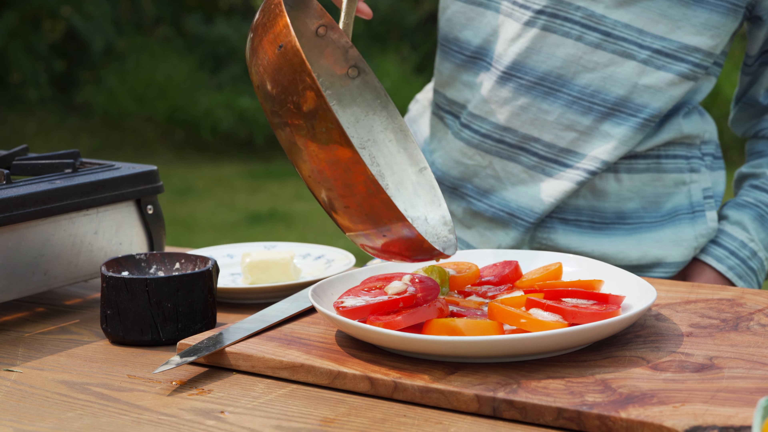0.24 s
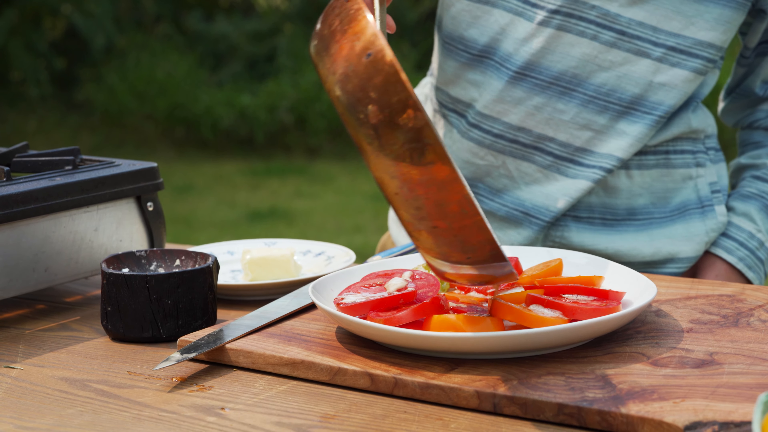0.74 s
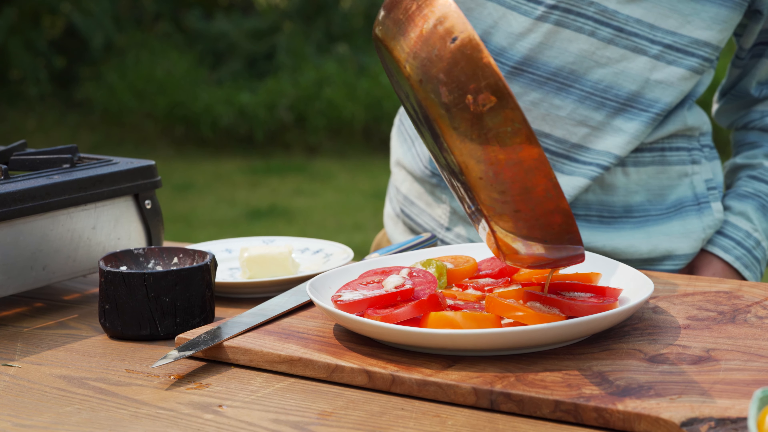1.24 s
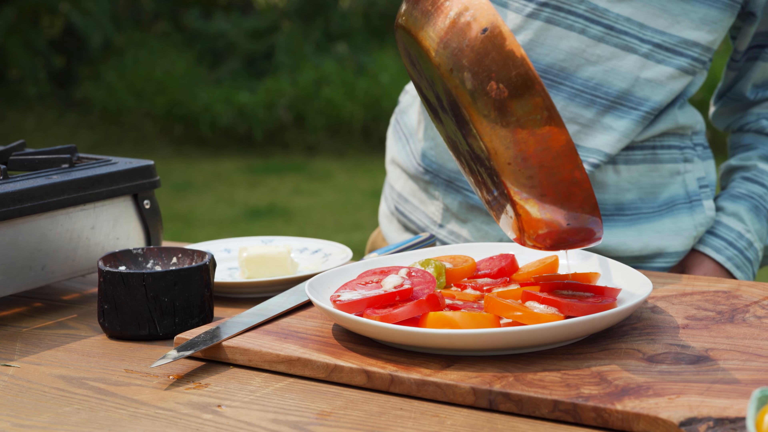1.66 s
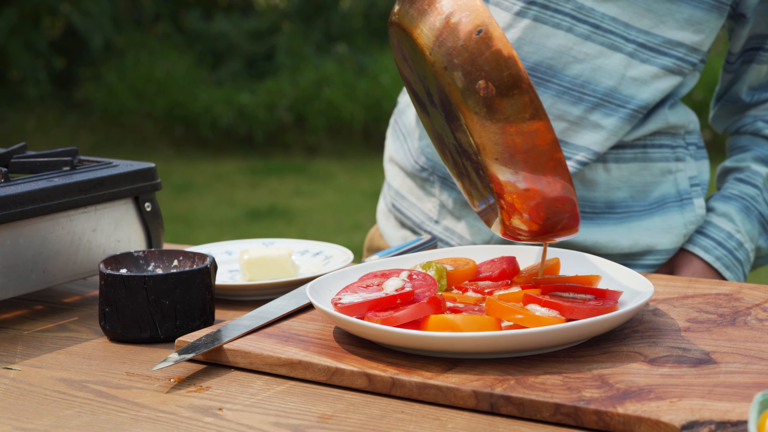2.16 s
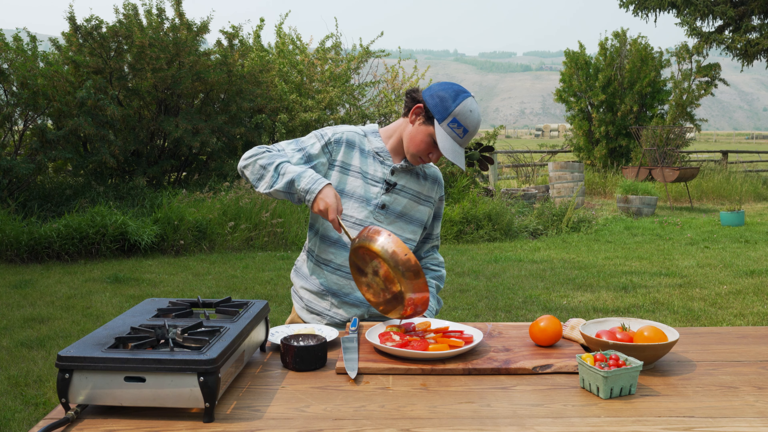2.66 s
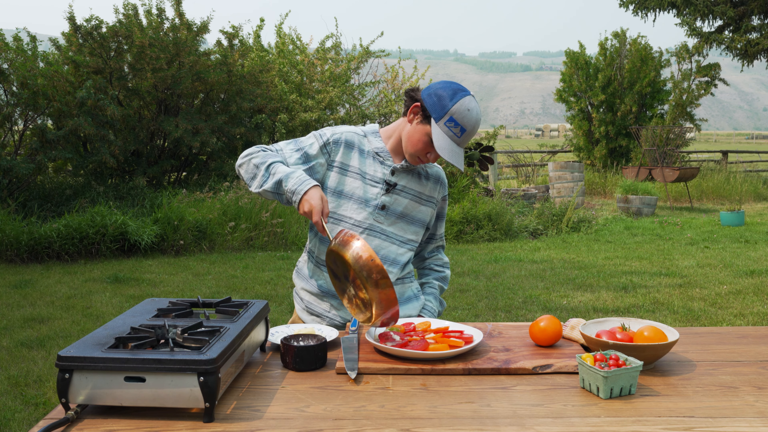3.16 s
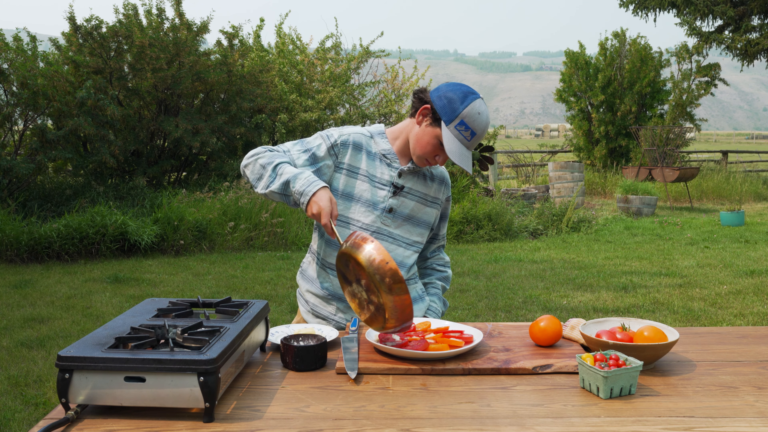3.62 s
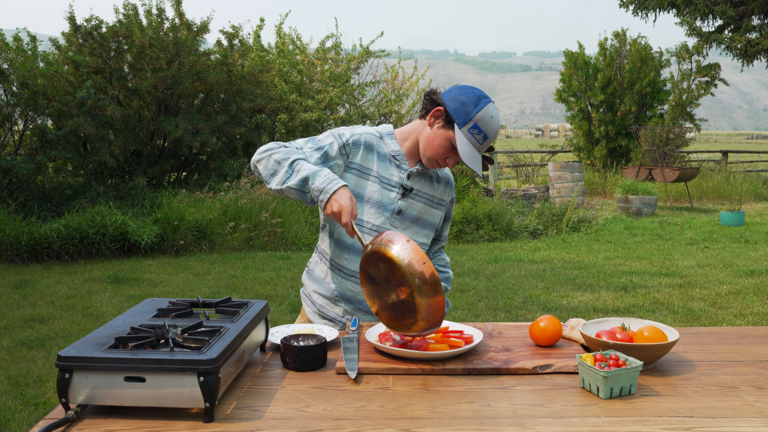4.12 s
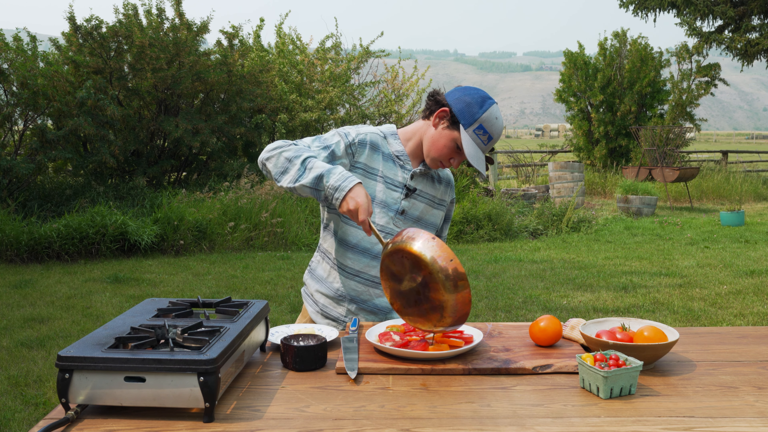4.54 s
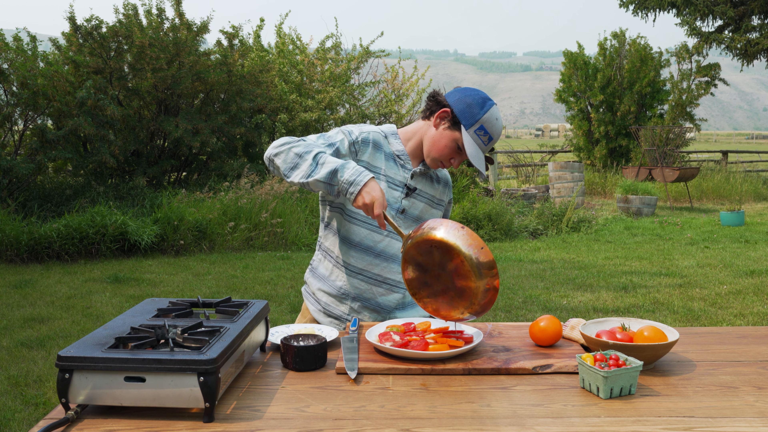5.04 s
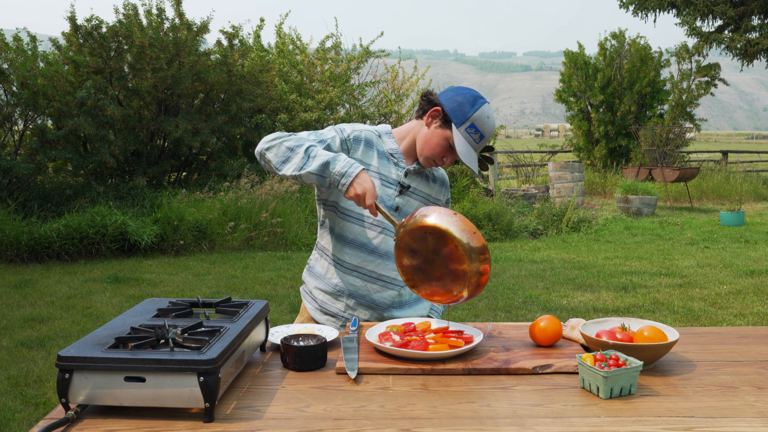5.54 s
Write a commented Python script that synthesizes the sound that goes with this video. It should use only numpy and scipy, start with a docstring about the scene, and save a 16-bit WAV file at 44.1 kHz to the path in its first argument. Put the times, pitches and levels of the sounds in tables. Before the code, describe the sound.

Hot butter poured from a metal pan hits a plate of wet tomato slices and sizzles at once, a bright hiss dotted with sharp little pops. This opening flurry fades by about 0.7 seconds. From there to 2 seconds only light, scattered crackles and brief soft hisses remain. The sizzle picks up modestly from about 2.2 to 3.3 seconds, then almost stops. At 4 seconds it swells again, with some of the loudest pops around 4.4 seconds, and thins out by 5. A last high hiss rises from about 5.4 seconds to the end. The tone of the bubbling shifts slightly as the pan tilts. Throughout, outdoor wind buffets the microphone with a low, uneven rumble, with short thumps near 1 second and stronger gusts from 4 seconds on. A faint hush of leaves and distant air sits underneath.

```python
"""A sizzle comes first, as hot butter runs from a tilted pan over cold, wet tomatoes. Steam bubbles
burst in flurries, a few loudly; each is a damped oscillator that also spits a puff of noise, and in
crowds they merge into a hiss. The air between pan and plate resonates at pitches set by the tilt.
Outdoors, eddies of wind buffet a small microphone; leaves and the far valley hush over a faint drone."""
import sys
import numpy as np
from scipy import signal
from scipy.fft import rfft, irfft, next_fast_len
from scipy.io import wavfile
from scipy.ndimage import uniform_filter1d, map_coordinates

SR = 44100
rng = np.random.default_rng(int(sys.argv[2]) if len(sys.argv) > 2 else 0)


def unload_wav(signal):
    """Save mono or channel-first audio to the path in sys.argv[1] as 16-bit WAV at rate SR, clipped to [-1, 1]."""
    wavfile.write(
        sys.argv[1],
        SR,
        np.round(np.clip(np.atleast_2d(signal).T, -1, 1) * 32767).astype(np.int16),
    )


N = 254898

# Flurries as butter meets wet, cold flesh. Each row: start and end in seconds, heat (the strength of
# the sizzle) at start and at end in dB, large bubbles over heat in dB, smoothness in dB (hiss gained
# and crackle lost).
FLURRIES = [(0, 0.361, -43, -53, 5, 1), (0.358, .7, -53, -61, 2.5, 0), (0.701, 0.788, -65, -66, 8, 5.5),
            (.8, 0.869, -64, -65, 5, -0.5), (0.973, 1.153, -67, -68, 3, 1),
            (1.251, 1.399, -74.5, -73, 5, -0.5), (1.431, 1.7, -65, -66, 1, 2),
            (2.11, 2.341, -66, -61, -0.5, 1.5), (2.338, 2.56, -59.5, -61, 4, 1),
            (2.569, 2.703, -63, -65, 3.5, 1), (2.744, 3.212, -60, -67, 2.5, -1),
            (3.279, 3.339, -63.5, -65, -1, 1.5), (3.365, 3.546, -71, -75, -0.5, -4),
            (3.971, 4.301, -72, -55, -2.5, -3), (4.301, 4.598, -54, -58, -3.5, -3),
            (4.63, 4.737, -64.5, -63, 0, 1.5), (4.789, 4.99, -64, -68, 2, 1),
            (5.349, 5.44, -66, -63, 0.5, 4.5), (5.445, 5.782, -57, -53, 0.5, 2.5)]
CATCH_DB_PER_S, DIE_DB_PER_S = 260, 190  # rise and fall of a flurry
SIMMER_DB, SIMMER_LARGE_DB = -78, -76  # heat and large bubbles between flurries
# Bursts that stand out. Each row: start in seconds, level in dB, pitch in Hz, relative spit in dB.
LOUD_BURSTS = [(0.044, -24.5, 6570, -29), (0.064, -16, 2510, -29), (0.0854, -18, 2570, -15),
               (0.169, -26, 2330, -1.5), (0.189, -20.5, 5130, -13), (0.1998, -20.5, 9300, -10),
               (0.258, -22, 6360, -14.5), (0.3152, -39, 2040, 3), (0.346, -38, 3450, 5),
               (0.373, -28.5, 4600, -25), (0.476, -28.5, 4300, -13), (0.5035, -20.5, 3440, -5),
               (0.521, -33, 3430, -3.5), (0.612, -31, 9200, -16), (0.6646, -37, 2580, -4.5),
               (0.767, -45.5, 4630, 1.5), (0.835, -46, 2320, -1), (1.0275, -30.5, 9700, -20),
               (1.07, -32.5, 10100, -36), (1.113, -45, 3120, -7), (1.1304, -43, 1990, -34),
               (1.1534, -38, 4200, -2.5), (1.167, -31, 1820, -19), (1.289, -49.5, 1970, 0),
               (1.422, -35.5, 8400, -18), (1.452, -38.5, 3470, -4.5), (1.4607, -38, 2230, -18),
               (1.538, -39.5, 8700, -5.5), (1.554, -41, 5600, -6), (1.6048, -35.5, 6000, -13),
               (1.6258, -44, 5700, -19), (1.639, -39, 10000, -14), (1.67, -41.5, 5570, -1),
               (1.7774, -44, 2280, -6), (2.147, -35, 7300, -22), (2.207, -36.5, 12200, -3),
               (2.279, -40.5, 1920, -9), (2.3292, -30.5, 5150, -16), (2.38, -37, 3470, 2),
               (2.4325, -39, 3700, -4), (2.509, -48, 3470, -2), (2.5255, -45.5, 3410, 1),
               (2.546, -47.5, 3500, 4), (2.604, -46.5, 3600, -3), (2.658, -41.5, 6500, -2),
               (2.6688, -43.5, 3630, -2), (2.6982, -39.5, 2200, -20), (2.7427, -40, 5000, -10),
               (2.76, -36.5, 2200, -14), (2.777, -43.5, 3480, 3), (2.825, -32.5, 10500, -14),
               (2.887, -27.5, 7600, -38), (2.9177, -33.5, 2170, -10.5), (2.957, -36, 3180, 2.5),
               (2.975, -29.5, 7400, -22), (3.0609, -40, 5810, -6), (3.0755, -42, 2720, -8),
               (3.1291, -35, 5960, -12.5), (3.282, -35, 8200, -18), (3.3157, -32.5, 8500, -11),
               (3.4401, -45.5, 2030, -11), (3.461, -38, 11000, -12.5), (3.549, -51, 3420, 3.5),
               (3.83, -51, 3450, -19), (3.875, -46.5, 3400, -21), (4.006, -41.5, 5070, -5),
               (4.04, -40.5, 2570, -16), (4.05, -41.5, 2470, -7.5), (4.074, -36.5, 5300, 0),
               (4.1001, -26.5, 5600, -11), (4.152, -38, 2600, 2.5), (4.1676, -31.5, 4800, -4),
               (4.2022, -42, 2470, -1), (4.2199, -25.5, 9300, -17), (4.2353, -26.5, 7800, -36),
               (4.261, -29.5, 7150, -34), (4.322, -31, 6650, -31), (4.342, -28.5, 7300, -33),
               (4.4048, -19, 3390, -20), (4.429, -25.5, 4700, -11.5), (4.452, -15.5, 2440, -21),
               (4.46, -33.5, 2500, -8), (4.4768, -28, 7800, -13), (4.4943, -30, 6300, -18),
               (4.522, -29, 9980, -21), (4.541, -22.5, 9300, -22), (4.5602, -34.5, 6400, -11.5),
               (4.5948, -37, 4870, -14), (4.6514, -37, 5040, -11), (4.6832, -36, 4800, -12),
               (4.7196, -40.5, 4900, -6), (4.783, -41, 5810, -7), (4.797, -42.5, 5000, -9),
               (4.821, -39, 5000, -3), (4.871, -38, 5000, -28), (4.886, -41, 5000, -9),
               (4.918, -36.5, 9500, -15), (4.939, -38, 4880, -10.5), (5.046, -61, 2400, 11.5),
               (5.087, -35.5, 11600, -13.5), (5.1873, -50.5, 4950, 2), (5.223, -50.5, 5100, -1),
               (5.24, -54, 2400, 5), (5.393, -35.5, 10500, -20), (5.462, -34, 8800, -9),
               (5.5436, -39, 12200, -4), (5.608, -36.5, 12300, -12), (5.613, -37, 4800, -5),
               (5.637, -34, 4850, -6.5), (5.737, -35.5, 5000, -9)]
EVEN_HZ, BRIGHTER_DB_PER_OCT, LOUD_DULLS = 5900, 3.5, 0.49  # spit brightens with pitch, dulls with level
OVERTONE_RATIO, OVERTONE_DB = 1.257, -5.5  # second ring of a loud burst
RING_CYCLES_EXPONENT = 0.25  # smaller, higher bubbles ring for more cycles
# Spectra of a burst's noise. Each row: frequency in Hz, relative spectral density in dB.
LOW_SPIT = [(1000, -17), (1800, -10), (2300, -1.5), (4500, -6), (7000, -4), (10000, -7.5)]
HIGH_SPIT = [(3000, -66), (5000, -2), (7000, -9.5), (10000, 0), (13000, -2), (16000, -13.5)]
THUD = [(250, -11), (600, -5.5), (1400, -4), (2200, -1.5)]
# Modes of the air pocket, one list for each tilt. Each row: frequency in Hz, bandwidth in Hz, gain in dB.
POCKET_MODES = [
    [(2510, 500, -4), (3330, 170, 0), (5000, 300, -15), (15200, 8300, -2)],
    [(1990, 68, 5.5), (2410, 45, 1), (9200, 180, -5)],
    [(3510, 160, 10), (2780, 74, -7), (4700, 630, 2), (6700, 430, 2), (12200, 780, -3)],
    [(2170, 410, -5.5), (2650, 78, 6), (3470, 240, 2), (5300, 390, -8), (7600, 980, -8.5)],
    [(2400, 440, 1.5), (4800, 500, 1), (9300, 1300, -7.5)],
    [(2200, 150, -1), (3230, 170, 2), (6650, 1100, -5.5)],
    [(2170, 100, 3.5), (3250, 320, -1.5), (4900, 240, 3)],
    [(3580, 220, 3), (4950, 370, 0.5), (8540, 430, -4), (10500, 430, 2.5), (12700, 810, 3),
     (15200, 2200, 6)],
]
# Each entry: the time in seconds at which one tilt gives way to the next.
TILT_ENDS = [1.0, 2.05, 2.72, 3.9, 4.25, 4.6, 5.28]
# Wind on the microphone. Each row: time in seconds, buffet level in dB, flutter over buffet in dB.
WIND_LEVELS = [(0, -42, -6.5), (.45, -48, -16.5), (0.85, -43, -14.5), (1.1, -44.5, -12.5),
               (1.35, -42.5, -4), (1.65, -40.5, -13.5), (2.1, -50, -11), (2.45, -55.5, -7.5),
               (2.6, -42.5, -9), (3.2, -47.5, -13.5), (3.85, -48, -15.5), (3.97, -39.5, -9.5),
               (4.15, -35, -13), (4.6, -40, -7.5), (4.8, -49, -3.5), (5.15, -40, -10.5), (5.45, -37, -10),
               (5.78, -37.5, -13)]
# Rushing air. Each row: time in seconds, level of the wind's body in dB, level of the far hush in dB.
HUSH_LEVELS = [(0.0, -66, -58.5), (0.24, -73.5, -67), (0.8, -70, -67), (2.22, -76, -69.5),
               (2.85, -65, -63.5), (3.33, -72, -70.5), (3.45, -64, -68), (3.8, -64.5, -68),
               (3.95, -76.5, -68.5), (4.7, -74, -70), (5.78, -65, -63.5)]
# Spectra of wind and background. Each row: frequency in Hz, relative spectral density in dB.
BUFFET = [(8.8, -34), (15, 0), (49, 3.5), (96, -5.5), (130, -23), (170, -49), (290, -120)]
FLUTTER = [(60, -13), (100, 0), (160, -9), (250, -22), (400, -37.5), (800, -51)]
WIND_BODY = [(150, -3.5), (280, 1.5), (450, -2.5), (700, -9), (1500, -21), (2600, -18)]
FAR_DRONE = [(88, -15), (100, 14), (112, -49)]
FAR_HUSH = [(400, -4.5), (800, 9.5), (1100, 8.5), (1600, -0.5), (2300, -4.5), (4200, -13), (12000, -16),
            (16000, -10)]
# Gusts that thump the microphone. Each row: start in seconds, lift in dB, length in seconds.
GUSTS = [(0.553, 6, 0.05), (0.751, 13, 0.025), (0.91, 7.5, 0.047), (1.24, 4, 0.058), (1.279, 3.5, 0.037),
         (2.715, 8.5, 0.025), (2.878, -2, 0.048), (3.456, 3.5, 0.038), (4.034, 4, 0.036),
         (4.204, 2.5, 0.066), (4.668, 8.5, 0.039), (4.862, 7, 0.079), (5.054, 11.5, 0.049),
         (5.13, 9, 0.025), (5.198, 8, 0.069), (5.586, 6, 0.079)]
GUST_EDGE_S, FLUTTER_GROWS = 0.0058, 0.078  # rise and fall of a gust; extra share of its lift in flutter
TOP_HZ, EDGE_HZ = 15800, 16500
FFT_SIZE = next_fast_len(N + 8192)


def amp(db):
    return 10 ** (np.asarray(db) / 20)


def unit(x):
    return x / np.sqrt(np.mean(x ** 2) + 1e-20)


def curves(rows, t):
    """Each column after the time, interpolated at times t."""
    times, *columns = np.transpose(rows)
    return [np.interp(t, times, column) for column in columns]


def wobble(rate):
    """A smooth random curve of rate knots a second."""
    knots = rng.standard_normal(int(N * rate / SR) + 4)
    return map_coordinates(knots, [np.arange(N) * rate / SR])


def coloured(x, spectrum):
    """A filter of the given spectrum, scaled so that white noise keeps its power."""
    hz = np.fft.rfftfreq(FFT_SIZE, 1 / SR)
    knot_hz, db = np.transpose(spectrum)
    gain = amp(np.interp(np.log(hz + 1), np.log(knot_hz + 1), db, -120, -120))
    return irfft(rfft(x, FFT_SIZE) * unit(gain), FFT_SIZE)[:N]


def noise(spectrum, db):
    """Coloured noise, amplitude-modulated by a curve in dB."""
    return amp(db) * coloured(rng.standard_normal(N), spectrum)


def scatter(starts, rows):
    """Superposition of rows of samples, each at its start in seconds."""
    at = np.round(starts * SR).astype(int)[:, None] + np.arange(rows.shape[1])
    return np.bincount(at.ravel(), rows.ravel(), N + SR)[:N]


def flurries(t):
    """Boiling flares and dies exponentially; the strongest flurry prevails over a steady simmer."""
    start, end, first_db, last_db, large_db, smooth_db = np.transpose(FLURRIES)[..., None]
    each_db = first_db + (last_db - first_db) * np.clip((t - start) / (end - start), 0, 1)
    each_db -= CATCH_DB_PER_S * np.maximum(start - t, 0) + DIE_DB_PER_S * np.maximum(t - end, 0)
    heat_db = np.maximum(each_db.max(axis=0), SIMMER_DB)
    deep_db = np.maximum((each_db + large_db).max(axis=0), SIMMER_LARGE_DB)
    return heat_db, deep_db, smooth_db[each_db.argmax(axis=0), 0] * (heat_db > SIMMER_DB)


def bursts(starts, hz, ring_db, low_db, high_db, cycles, spit_s, samples):
    """Damped oscillation: each bubble rings, rising in pitch as it opens, and spits a puff of noise."""
    t = np.arange(samples) / SR
    fade = np.cos(np.pi / 2 * np.arange(samples) / samples)
    turns = hz[:, None] * t
    decay_turns = cycles * (hz[:, None] / 3000) ** RING_CYCLES_EXPONENT
    envelope = np.exp(-turns / decay_turns) * (1 - np.exp(-turns / 0.69)) * fade
    ring = np.sin(2 * np.pi * turns * (1 + 0.0048 * turns)) * envelope
    puff = np.exp(-t / spit_s) * (1 - np.exp(-t / 0.0001)) * fade
    sound = scatter(starts, amp(ring_db)[:, None] * ring)
    for db, spectrum in [(low_db, LOW_SPIT), (high_db, HIGH_SPIT)]:
        spits = amp(db)[:, None] * puff * rng.standard_normal(ring.shape)
        sound += coloured(scatter(starts, spits), spectrum)
    return sound


def sizzle(t, count=4200):
    """Incoherent addition: small bubbles burst in clumps, denser with heat, and merge into a hiss."""
    heat_db, deep_db, smooth_db = flurries(t)
    clumps_db = 6 * wobble(170) + 1.4 * wobble(45)
    activity = np.cumsum(amp(0.65 * heat_db + clumps_db))
    when, strength, kind = rng.random((count, 3)).T
    pitch_spread, low_spread, high_spread = rng.standard_normal((count, 3)).T
    starts = np.interp(when * activity[-1], activity, t)
    heat, deep, smooth = flurries(starts)
    # Few are strong and many weak; a crowd shares the power.
    share_db = -0.42 * (heat + 60) - smooth - 5.77 * np.log(strength + 0.09)
    large = kind < 0.3
    hz = np.clip(np.where(large, 3500, 9000) * np.exp(0.316 * pitch_spread), 2150, 15500)
    ring_db = share_db + np.where(large, deep - 3, heat + 2.8)
    low_db = share_db + deep + 5 * np.clip(low_spread, -3, 1.2) - 3.5
    high_db = share_db + heat + 5.3 * np.clip(high_spread, -3, 1.2) - 2.5
    crackle = bursts(starts, hz, ring_db, low_db, high_db, cycles=3.67, spit_s=0.00044, samples=128)
    merged_db = 0.52 * (heat_db + 41) + 0.055 * clumps_db + smooth_db - 7.5
    return crackle + noise(LOW_SPIT, merged_db + deep_db) + noise(HIGH_SPIT, merged_db + heat_db)


def drifting_colour(x, depth_db):
    """Spectral modulation: the level drifts in patches about a kilohertz by tens of milliseconds."""
    spectra = signal.stft(x, nperseg=256)[2]
    patches = uniform_filter1d(rng.standard_normal(spectra.shape), size=8, axis=0)
    patches = uniform_filter1d(patches, size=8, axis=1)
    return signal.istft(spectra * amp(depth_db * unit(patches)), nperseg=256)[1][:N]


def air_pocket(x, t):
    """Cavity resonance: the air between pan and plate adds one set of modes for each tilt."""
    f = np.fft.rfftfreq(FFT_SIZE, 1 / SR)
    tilt = np.searchsorted(TILT_ENDS, t)
    sound = np.zeros(N)
    for k, modes in enumerate(POCKET_MODES):
        resonance = sum(amp(db) * 1j * f * width / (hz * hz - f * f + 1j * f * width)
                        for hz, width, db in modes)
        sound += irfft(rfft(x * (tilt == k), FFT_SIZE) * (1 + resonance), FFT_SIZE)[:N]
    return sound


def wind(t):
    """Turbulent pressure: the same eddies drive a low buffet, a higher flutter and the wind's body."""
    buffet_db, flutter_db = curves(WIND_LEVELS, t)
    body_db, _ = curves(HUSH_LEVELS, t)
    lift_db = gusts(t)
    eddies = np.minimum(wobble(15), 1.2)
    buffet = amp(buffet_db + lift_db) * unit(noise(BUFFET, 2.84 * eddies))
    flutter_gain = amp(buffet_db + flutter_db + (1 + FLUTTER_GROWS) * lift_db)
    flutter = flutter_gain * unit(noise(FLUTTER, 2.9 * eddies + 2.1 * wobble(18)))
    body = amp(body_db) * unit(noise(WIND_BODY, 0.36 * eddies + 0.57 * wobble(8.7)))
    return buffet + flutter + body


def valley(t):
    """Broadband noise from leaves and the far valley wavers over a faint narrowband drone."""
    _, hush_db = curves(HUSH_LEVELS, t)
    drone = amp(-62) * unit(noise(FAR_DRONE, 0.78 * wobble(3.2)))
    hush = amp(hush_db) * unit(noise(FAR_HUSH, wobble(3.93)))
    return drone + hush


def pops():
    """Impulsive excitation: a loud burst thuds, spits and rings at two pitches."""
    starts, db, hz, spit_db = np.transpose(LOUD_BURSTS)
    bright_db = BRIGHTER_DB_PER_OCT * np.log2(hz / EVEN_HZ) - LOUD_DULLS * (db - db.mean())
    low_db = db + spit_db - 0.31 * bright_db
    high_db = db + spit_db + 0.52 * bright_db
    thuds = coloured(scatter(starts, amp(low_db - 2.5)[:, None]), THUD)
    return thuds + sum(bursts(starts, ratio * hz, db + ring_db, low_db - 7.5, high_db - 11,
                              cycles=1.95, spit_s=0.0016, samples=320)
                       for ratio, ring_db in [(1, 1.5), (OVERTONE_RATIO, OVERTONE_DB)])


def gusts(t):
    """Each gust shifts the wind's level by a trapezoidal envelope in dB."""
    start, db, length = np.transpose(GUSTS)[..., None]
    inside_s = np.minimum(t - start, start + length - t)
    return (db * np.clip(inside_s / GUST_EDGE_S + 1, 0, 1)).sum(axis=0)


def scene():
    """Superposition in one channel: the bubbles, heard through the air pocket, with wind and valley."""
    t = np.arange(N) / SR
    bubbles = pops() + drifting_colour(sizzle(t), depth_db=2.1)
    return (air_pocket(bubbles, t) + wind(t) + valley(t))[None]


def record(dry):
    """Band limiting: almost nothing passes above TOP_HZ, and nothing above EDGE_HZ."""
    hz = np.fft.rfftfreq(FFT_SIZE, 1 / SR)
    gain = np.where(hz < TOP_HZ, 1, amp(-35)) * (hz < EDGE_HZ)
    return irfft(rfft(dry, FFT_SIZE) * gain, FFT_SIZE)[:, :N]


dry = scene()
out = record(dry)
unload_wav(out)
```